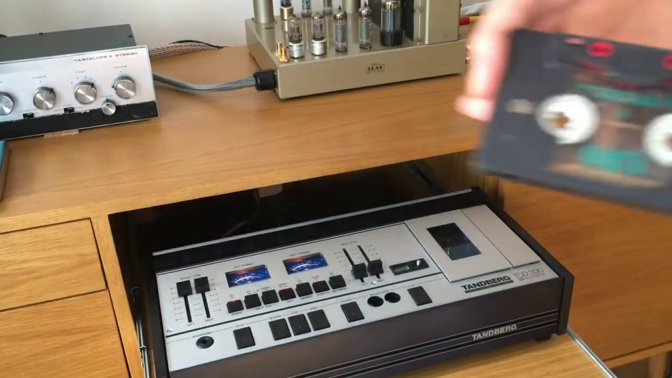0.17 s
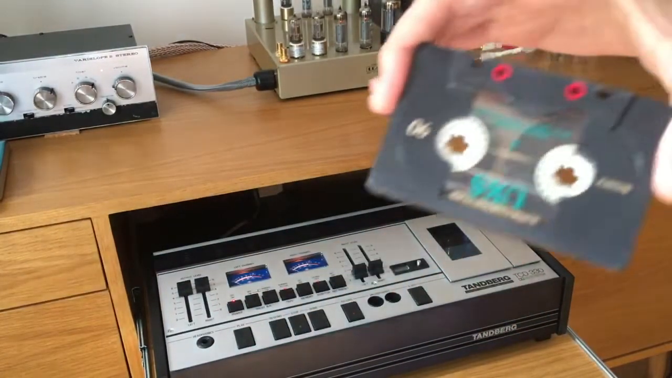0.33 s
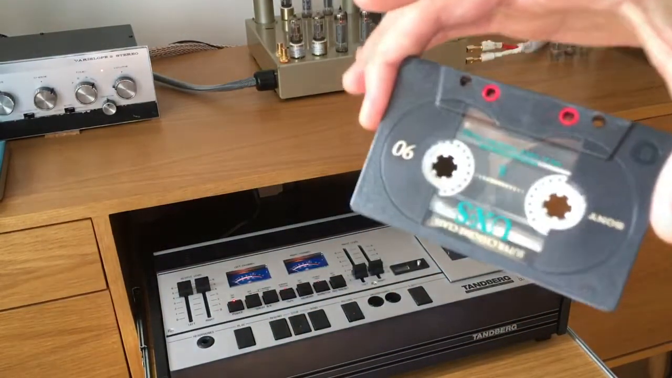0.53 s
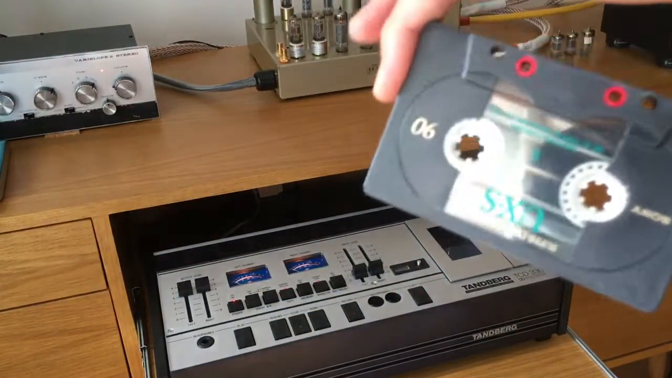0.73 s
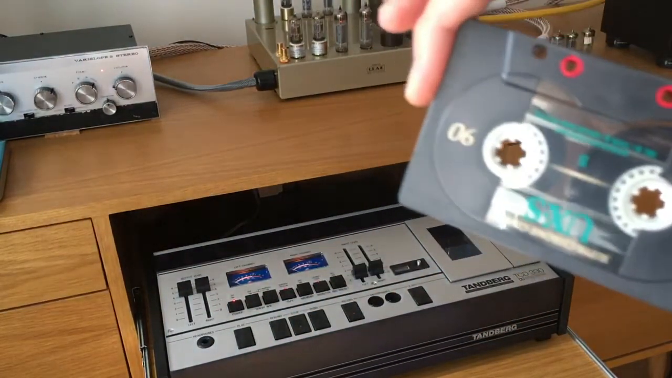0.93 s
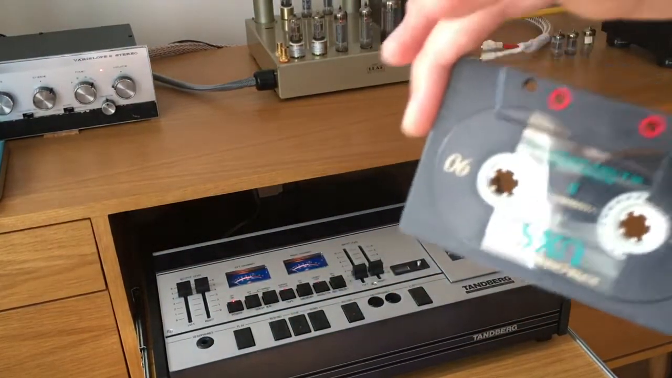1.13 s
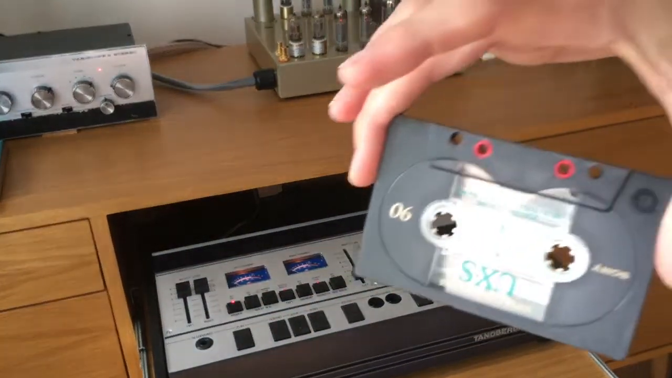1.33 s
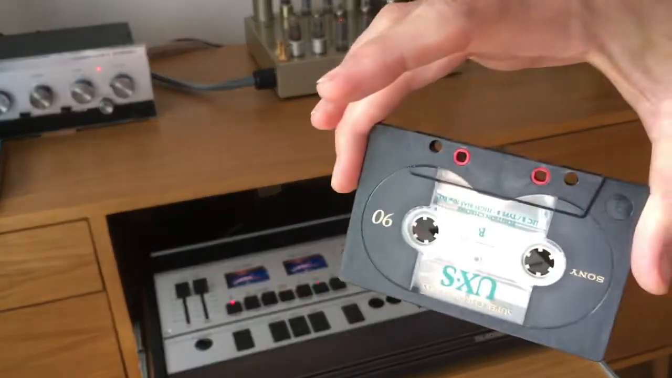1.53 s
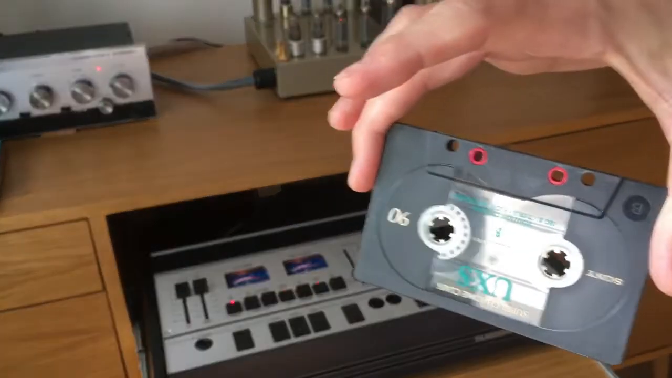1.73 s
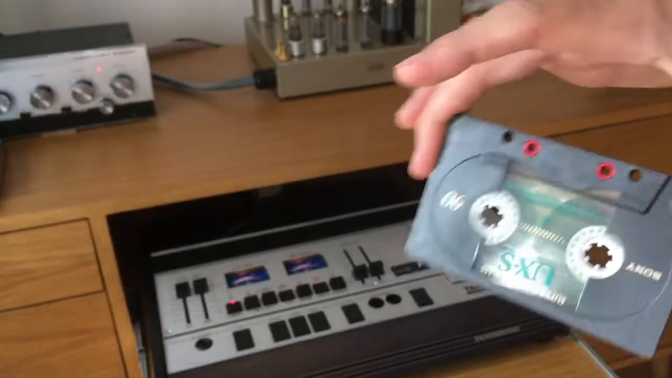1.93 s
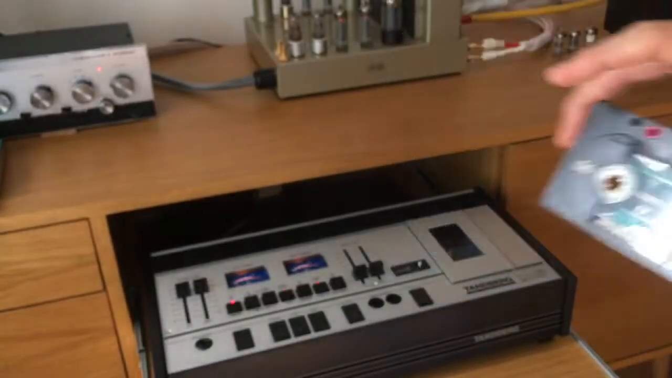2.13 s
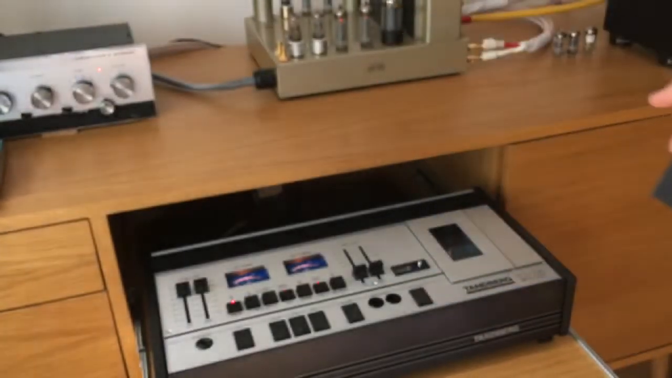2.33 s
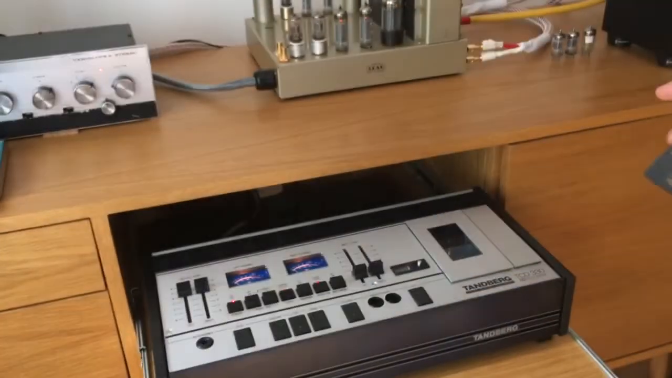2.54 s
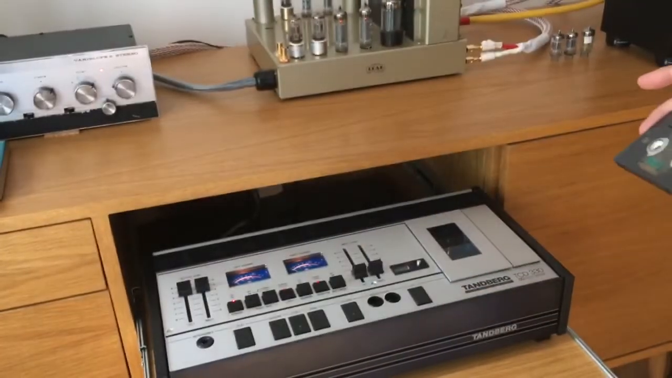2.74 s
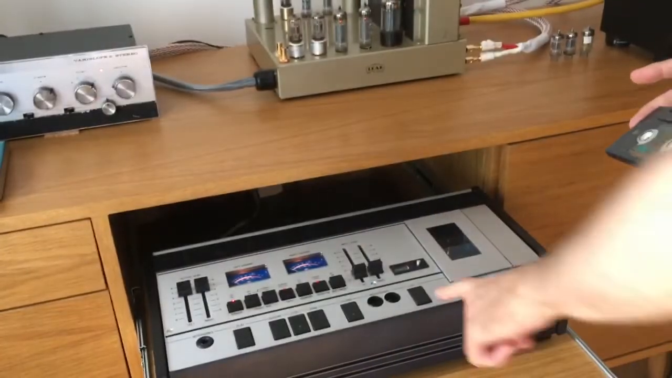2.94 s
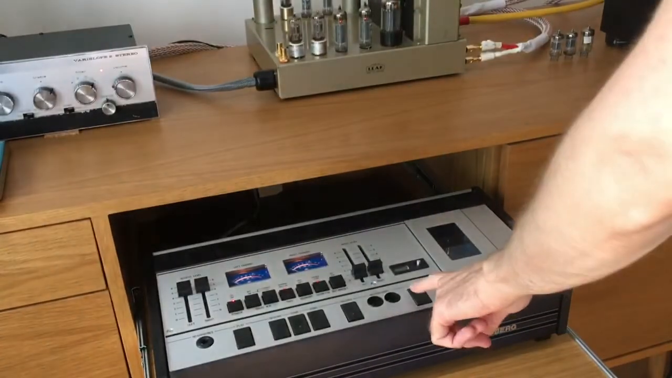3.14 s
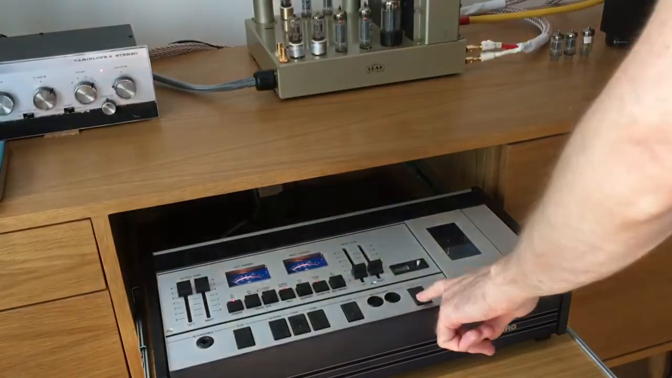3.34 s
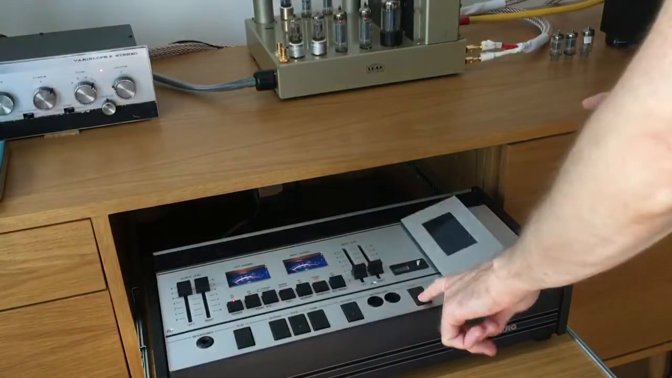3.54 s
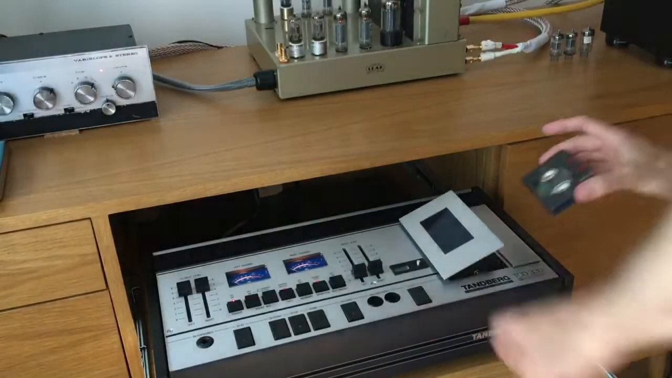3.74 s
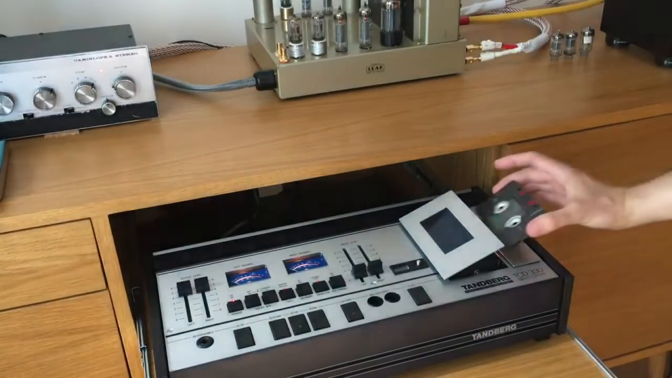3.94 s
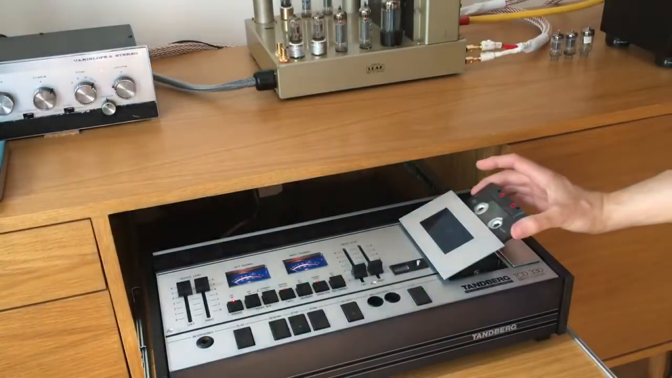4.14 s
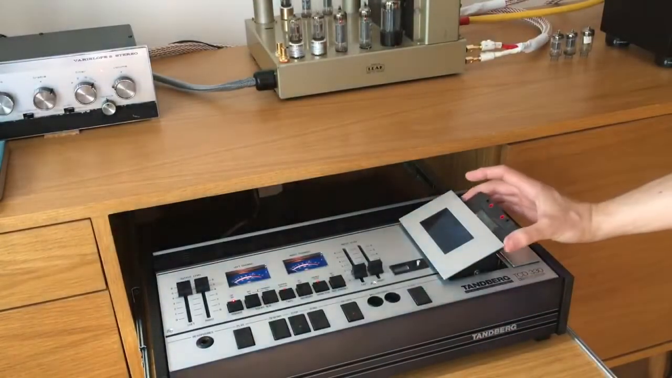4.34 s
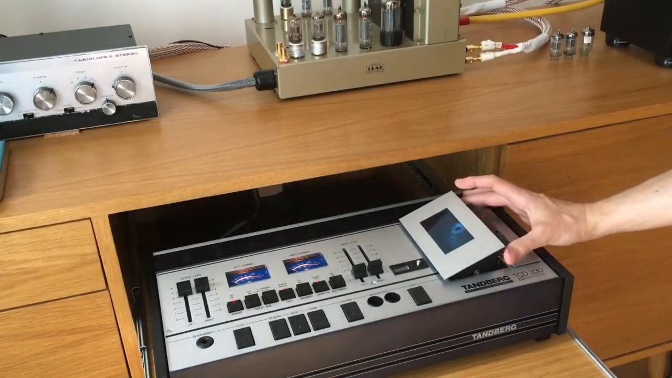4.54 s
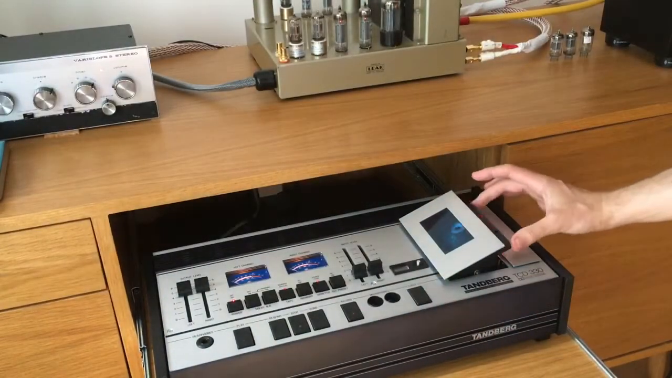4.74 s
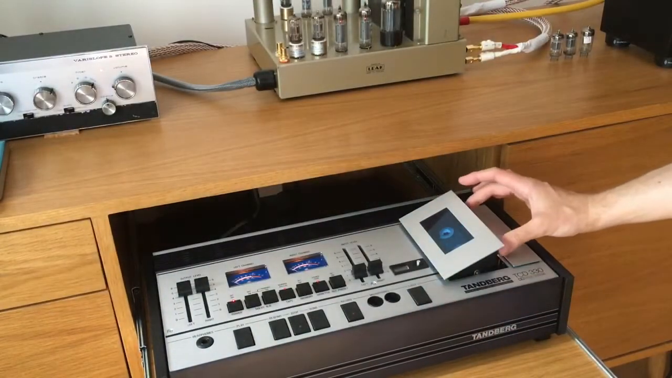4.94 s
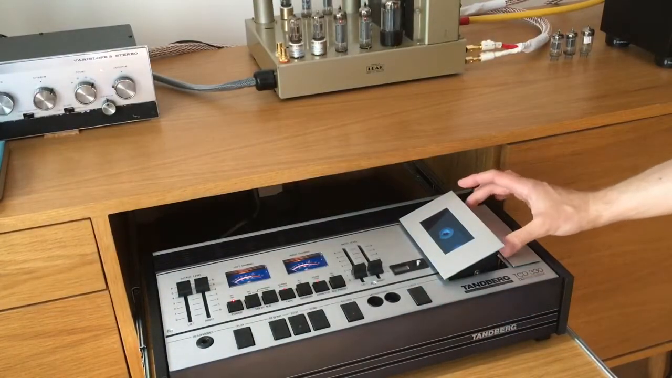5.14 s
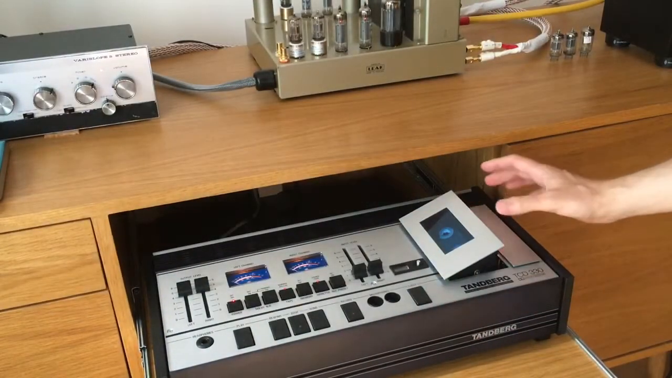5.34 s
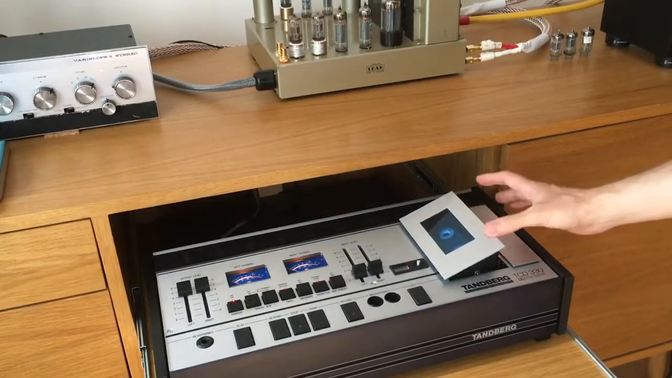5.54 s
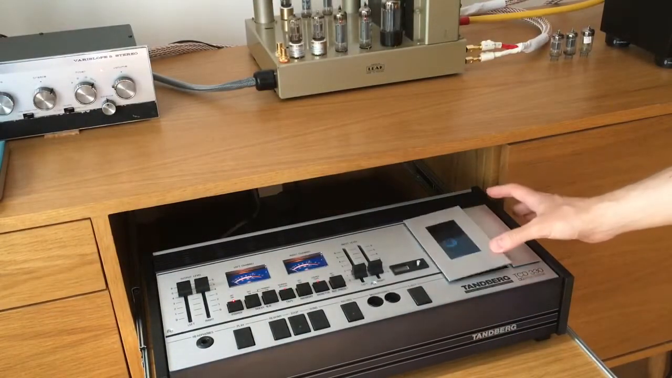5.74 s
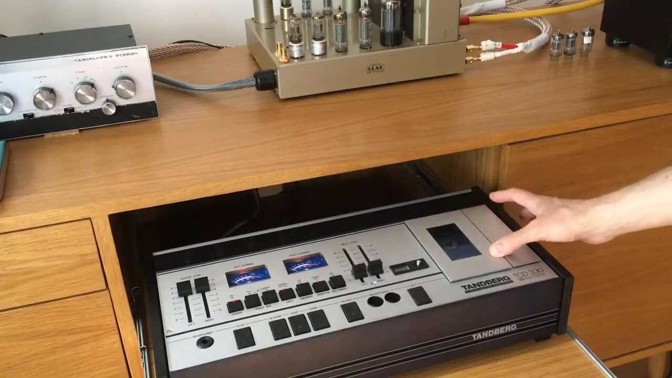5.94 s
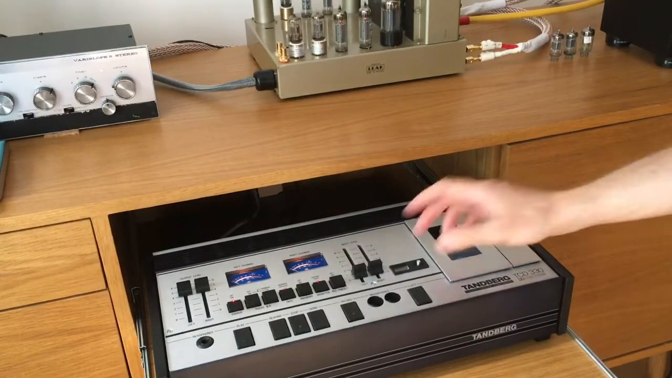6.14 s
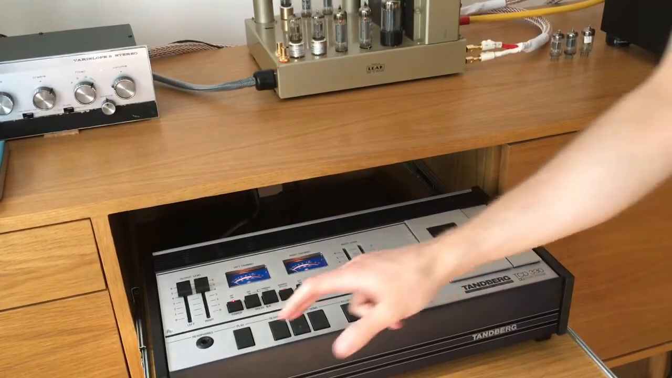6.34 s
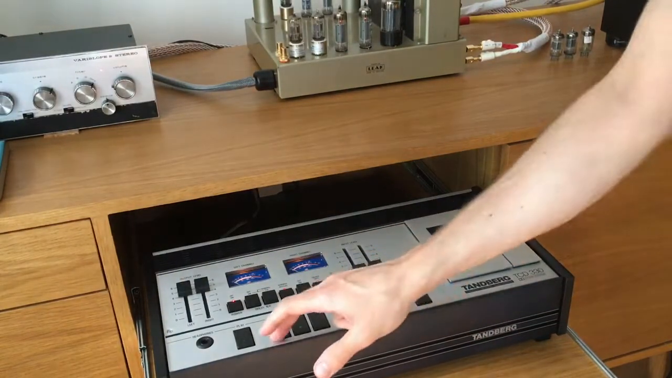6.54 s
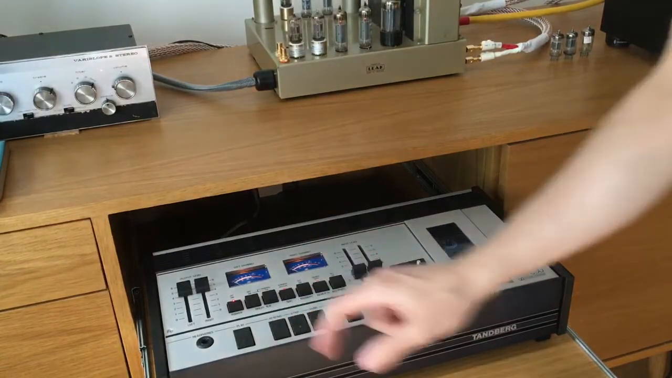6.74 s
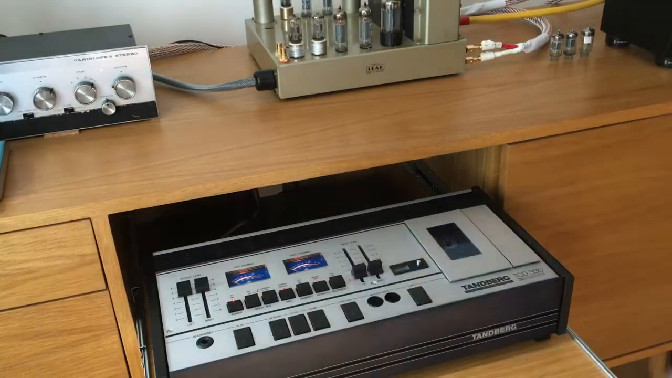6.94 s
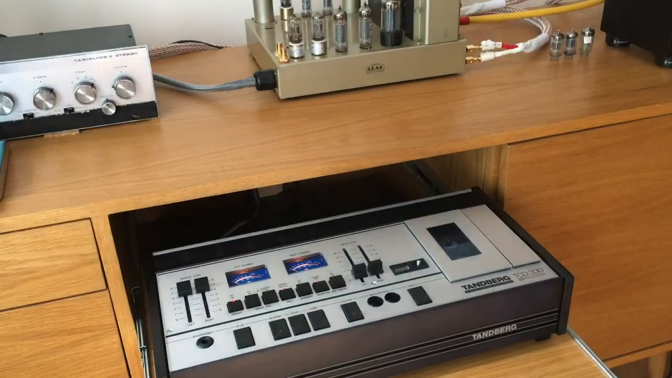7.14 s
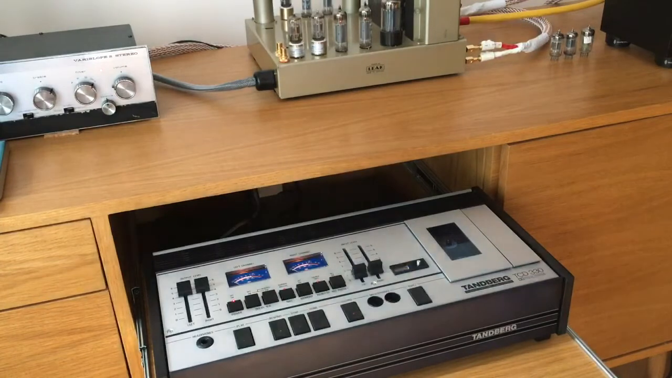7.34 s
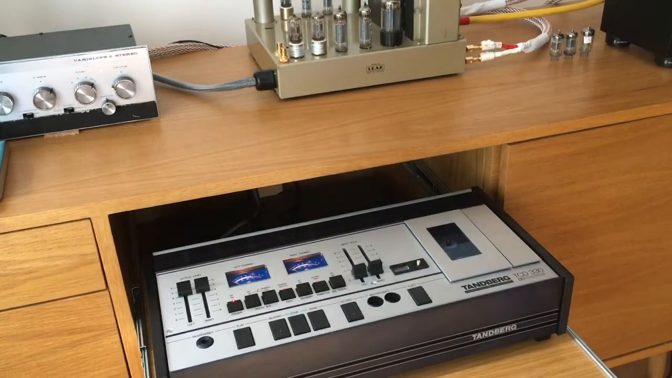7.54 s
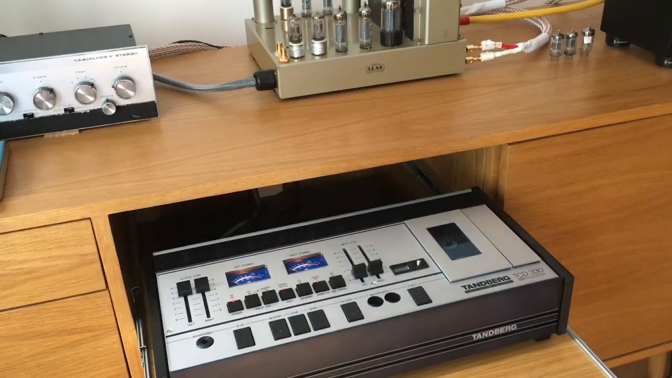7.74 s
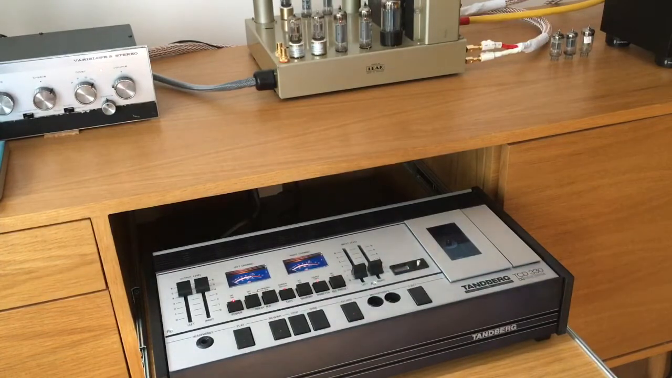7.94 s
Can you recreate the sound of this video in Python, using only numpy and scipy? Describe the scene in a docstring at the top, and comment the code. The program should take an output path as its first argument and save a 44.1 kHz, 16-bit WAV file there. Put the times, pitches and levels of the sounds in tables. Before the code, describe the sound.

A small quiet room with still air and a faint wavering low hum, heard close. Faint dull and plastic ticks of a handled cassette at 0.2-0.4 s, a tiny hub rattle near 0.9 and weak ticks around 2.0. From 2.4 a rattle leads to sharper clacks at 2.5-2.75, the last strong. Barely audible high squeaks near 2.9 and a soft bump at 3.1. At 3.42-3.6 the eject key and door burst open: very loud, bright, overloaded clacks with a deep cabinet thump and springy ring. From 3.96 to 5.2, irregular double taps and faint plastic slides, strongest at 4.9 and 5.1. The door is pushed down with hollow knocks from 5.57, then a tiny creak and bright latch snap at 5.79, and release clack at 5.96. Key touches at 6.3-6.4, a firmer click at 6.6, small ticks near 6.95, then faint hiss and high fluttering whine swell, swing and settle to the end.

```python
"""A cassette deck in a wooden cabinet: the eject key throws the door open, a cassette is slid in, the door snaps shut.
Before that the cassette is turned in the hand; afterwards keys click and the tape starts to hiss and whine.
Every contact is a crack plus a short ring, mostly duller, of the struck part; the cabinet adds deep thumps.
Plastic slides are coloured noise, squeaks are gliding tones. The place is a small room with a diffuse tail,
a low boom, still air and a wavering hum; the recorder clips at full scale and cuts the top.
"""
import sys
import numpy as np
from scipy import signal
from scipy.fft import rfft, irfft
from scipy.io import wavfile
from scipy.ndimage import uniform_filter1d

SR = 44100
rng = np.random.default_rng(int(sys.argv[2]) if len(sys.argv) > 2 else 0)


def wav_out(sig):
    """Save sig, one row per channel (or a flat mono array), as 16-bit PCM at SR to the path in sys.argv[1]."""
    wavfile.write(sys.argv[1], SR, np.round(np.clip(np.atleast_2d(sig).T, -1, 1) * 32767).astype(np.int16))


N = 356769
TIME = np.arange(N) / SR
HIT_SIZE = 8192  # samples given to one crack or ring

# All contact tables: [t/s, level/dB, hardness as treble slope/(dB per octave), ring over crack at 4 kHz/dB]
# The ring column is before each part's own ring tilt, which pivots at 4 kHz.
# Key and latch let go, the door hits its stop and bounces [t/s, level/dB, hardness/(dB/octave), ring/dB]
EJECT_BLOWS = [(3.4163, 2.5, -0.4, 5.5), (3.4233, 9.5, 3, -0.5), (3.4275, 9.5, -0.5, -5),
               (3.47, -5.5, 6.5, -6), (3.472, 14, -1.7, -0.5), (3.4793, 7, 2, -6), (3.5572, 6.5, -0.3, 24),
               (3.5768, -2, -0.5, -4), (3.6132, -10, 1.3, 5)]
# The cassette knocks along the door's guides [t/s, level/dB, hardness/(dB/octave), ring/dB]
LOADING_TAPS = [(3.962, -29.5, 0.5, 20), (4.1029, -40.5, 5.5, -6), (4.2128, -11, -4, 11),
                (4.2793, -27, 3, -5), (4.3032, -12.5, 0.7, -6.5), (4.3715, -30, 5, 0),
                (4.4227, -18.5, -6.5, 3), (4.5388, -12, 1, 2), (4.7762, -23, -0.1, -4.5),
                (4.8412, -18, -3, 4), (4.8758, -16, -4, -5), (4.9228, -5, -5, 6.5), (5.0338, -39, 4, -14),
                (5.132, -9, 1.2, -0.5), (5.1989, -25.5, 0.5, -4.5), (5.3585, -51, 8.5, -7)]
# The door is pushed down, latches and is released [t/s, level/dB, hardness/(dB/octave), ring/dB]
CLOSING_BLOWS = [(5.4932, -40.5, 8.5, 8), (5.5651, -20.5, 1.1, 5.5), (5.605, -6, -4, 13),
                 (5.6465, -8.5, -3.5, 25), (5.668, -6, -7, 18), (5.742, -10, -4, 21), (5.7556, -7, 1.2, -1),
                 (5.7607, -4.5, -1.5, 1), (5.7893, 1, 4.4, 5), (5.9605, -3.5, 0, 0.5)]
# The latch spring sizzles as it catches [t/s, level/dB, hardness/(dB/octave), ring/dB]
LATCH_RATTLES = [(5.791, -24, 10, 9)]
# Keys are touched and pressed [t/s, level/dB, hardness/(dB/octave), ring/dB]
KEY_CLICKS = [(6.3137, -14.5, 3, 3.5), (6.42, -20, -16, -1), (6.4315, -29.5, 4.4, 3), (6.59, -28, -9, 15),
              (6.6128, -6, -4, 4), (6.915, -32, -4, 19)]
# Ticks of the transport as it takes up the tape [t/s, level/dB, hardness/(dB/octave), ring/dB]
TAKE_UP_TICKS = [(6.973, -26.5, -15, 13), (7.06, -31, 1, 14)]
# The cassette handled in the air [t/s, level/dB, hardness/(dB/octave), ring/dB]
SHELL_TICKS = [(0.33, -29.5, 1, 4), (0.3973, -25, 2.6, 1), (1.962, -31.5, 0, 12), (2.01, -35, 0, 4),
               (2.5296, -9.5, 2, 2.5), (2.6168, -3, -1.4, 3.5), (2.6756, -15.5, -3, 9),
               (2.7491, 2, -2, -0.5)]
# The loose hubs drop against the shell [t/s, level/dB, hardness/(dB/octave), ring/dB]
REEL_RATTLES = [(0.9205, -20.5, -9, -1), (2.4078, -23.5, -2, 9)]
# Dull soft bumps: a knock on wood, then a muffled bump, probably of cloth
# [t/s, level/dB, hardness/(dB/octave), ring/dB]
DULL_BUMPS = [(0.2242, -20.5, -10.4, 10), (3.107, -33, -9, 13.5)]

# Resonances of the eject mechanism [f/Hz, width/Hz, level/dB]
MECHANISM_MODES = [(330, 17, -3.5), (650, 75, -8.5), (1090, 120, -1.5), (1390, 61, -4.5), (1600, 180, -6.5),
                   (2626, 310, -1.5), (2920, 350, 0.5), (5770, 700, -6.5), (9060, 330, -3),
                   (13850, 870, -1)]
# Resonances of the cassette holder [f/Hz, width/Hz, level/dB]
HOLDER_MODES = [(153, 25, 15.5), (332, 62, 14.5), (523, 33, 11), (629, 26, 10), (1150, 430, 3),
                (1640, 140, 1), (2780, 370, 7.5), (3400, 350, -7.5), (5700, 1340, -1.5), (13700, 2100, -12)]
# Resonances of the door [f/Hz, width/Hz, level/dB]
DOOR_MODES = [(126, 21, 14.5), (347, 67, 9), (514, 85, 12), (648, 57, 11), (1474, 50, 7), (2920, 580, 2.5),
              (6330, 510, -5.5), (9300, 510, -8), (13500, 430, 0), (14600, 770, -8)]
# Resonances of the latch spring [f/Hz, width/Hz, level/dB]
LATCH_MODES = [(9400, 500, 11), (11300, 700, 13), (13100, 500, 9), (14700, 700, 2)]
# Resonances of a key [f/Hz, width/Hz, level/dB]
KEY_MODES = [(170, 140, -1), (326, 72, -2), (740, 130, 1), (1095, 69, 3), (1670, 150, 8.5),
             (2350, 390, 0.5), (2920, 600, 0.5), (6470, 760, 0.5), (8400, 250, 2.5), (14100, 170, 8)]
# Resonances of the cassette shell [f/Hz, width/Hz, level/dB]
SHELL_MODES = [(172, 110, 3.5), (1080, 110, -22), (1920, 220, -15), (2670, 360, -9.5), (3370, 510, -4.5),
               (6160, 930, -0.5), (11600, 590, -7), (14000, 550, -14)]
# Resonances of a hub [f/Hz, width/Hz, level/dB]
REEL_MODES = [(1040, 250, 17.5), (2830, 180, 20.5), (3290, 240, 19.5), (5830, 820, 3)]
# Resonances heard in the dull bumps [f/Hz, width/Hz, level/dB]
BUMP_MODES = [(645, 110, 6.5), (930, 220, 16.5), (1462, 240, -3.5), (2501, 910, 7)]
# Corners of the broad colour of a struck part [f/Hz]
COLOUR_HZ = [500, 2000, 6000, 13000]

# Deep thumps of the cabinet, strong as the door is thrown open, very faint as it shuts [t/s, level/dB]
THUMPS = [(3.472, -1.5), (3.558, -10), (5.607, -56), (5.792, -43), (5.961, -22.5)]
# Modes of the cabinet (low) and the door springs (long), for a 0 dB thump [f/Hz, level/dB, t60/s]
CHASSIS_MODES = [(36.65, -39.5, 0.57), (62, -41.5, .35), (84.5, -33.5, .3), (110.5, -35, 0.61),
                 (160.4, -30, 0.24), (182.4, -37.5, 0.68), (227, -28, .38), (337, -41.5, .75),
                 (474.2, -60, 2.6), (660, -72, 4.3), (898, -63.5, 1.7), (994, -49.5, 1.3),
                 (1275, -55, 0.98), (1665, -70.5, 2.5), (1910, -66, 2.2), (2133, -76, 3), (2380, -60, 1.3),
                 (2560, -64.5, 2.7)]
# Plastic sliding on plastic [t/s, length/s, level/dB, rubbing resonance f/Hz]
SLIDES = [(3.96, 0.17, -66.5, 3600), (4.126, 0.11, -66, 1590), (4.244, 0.27, -64.5, 3020),
          (4.278, .009, -46, 5950), (4.769, 0.17, -61, 2890), (4.915, 0.08, -58, 1800),
          (5.543, 0.18, -57, 2500), (5.695, 0.13, -52.5, 2870)]
# Faint squeaks as the arm reaches over [t/s, length/s, start f/Hz, middle f/Hz, end f/Hz, level/dB]
SQUEAKS = [(2.85, .17, 11600, 13150, 12400, -70), (2.89, .11, 11000, 11500, 11300, -71),
           (2.97, .13, 12000, 11900, 11700, -71), (2.98, .11, 11100, 10800, 10500, -77),
           (2.98, .09, 4750, 4520, 4400, -74)]
# The latch creaks just before it catches [t/s, length/s, start f/Hz, middle f/Hz, end f/Hz, level/dB]
CREAKS = [(5.759, 0.0063, 2770, 2760, 2820, -25.5)]
# Spectral shape of the tape hiss [f/Hz, relative level/dB]
HISS_COLOUR = [(200, -18), (800, -6.5), (1120, 4), (1420, 4.5), (1750, -7.5), (2800, -2), (4400, -7.5),
               (6500, -4.5), (8000, -7.5), (10500, -5), (13000, -1), (15500, -1.5)]
# Low resonances of the room and furniture [f/Hz, width/Hz, level/dB]
BOOM_MODES = [(106, 37, 0), (160, 18, 4), (183, 8.3, 12), (265, 35, 0)]
# Spectral shape of the room air [f/Hz, relative level/dB]
AIR_COLOUR = [(30, -6.5), (70, 2), (130, -4.5), (185, -4.5), (300, -11), (450, -14), (900, -22.5),
              (2000, -23.5), (4700, -26.5), (6300, -25), (8000, -26), (10500, -24.5), (13000, -21),
              (16000, -23.5)]
# Tones of the hum, about which each wavers [f/Hz, level/dB]
HUM_TONES = [(35.5, -73), (48.5, -63), (97, -78), (184, -75), (258, -81), (624.5, -84.5)]
# The room's tail, before each source's own share of room [f/Hz, relative level/dB, t60/s]
ROOM_BANDS = [(100, 1, 0.31), (300, -3, 0.58), (1000, -7, 0.3), (3000, -11.5, 0.35), (7000, -13.5, .36),
              (15000, -17, 0.24)]

# The loose cassette lands twice; the second touch is weaker and duller (dB per octave)
REBOUND_S, REBOUND_DB, REBOUND_SOFTER_DB = .008, -5.5, 2.5
# The tape starts, and its tension swings a few times before it settles
TAPE_START_S, SWING_PERIOD_S, SETTLE_S = 6.93, 0.34, 0.27
# The room's boom at rest, and its swell as the arm reaches for the eject key
REST_DB, REACH_DB, REACH_S, REACH_WIDTH_S = -68, -55, 3.13, .16


def eject():
    """Key, latch and door stop: hard blows ring the mechanism."""
    return contacts(EJECT_BLOWS, MECHANISM_MODES, rise_s=.0003, crack_t60=.011, ring_t60=0.083,
                    ring_tilt_db=-1.5, low_cut_hz=130, bass_db=-3, treble_db=-0.05)


def loading():
    """The cassette taps the guides and rebounds, ringing the holder."""
    return contacts(rebounding(LOADING_TAPS), HOLDER_MODES, rise_s=0.00067, crack_t60=0.014, ring_t60=0.069,
                    ring_tilt_db=-1.5, low_cut_hz=93, bass_db=-7, treble_db=-2.5)


def closing():
    """Pushing and latching blows ring the door."""
    return contacts(CLOSING_BLOWS, DOOR_MODES, rise_s=0.00055, crack_t60=0.015, ring_t60=0.076,
                    ring_tilt_db=-5.0, low_cut_hz=126, bass_db=-7.5, treble_db=-2.0)


def latch():
    """The light latch spring swells into a bright, thin sizzle."""
    return contacts(LATCH_RATTLES, LATCH_MODES, rise_s=.003, crack_t60=0.022, ring_t60=0.14,
                    ring_tilt_db=1, low_cut_hz=3000, bass_db=-7, treble_db=-10.5)


def keys():
    """Key touches and transport ticks ring small parts."""
    return contacts(KEY_CLICKS + TAKE_UP_TICKS, KEY_MODES, rise_s=.0001, crack_t60=0.008, ring_t60=0.088,
                    ring_tilt_db=-4.5, low_cut_hz=280, bass_db=-7.5, treble_db=-3.5)


def shell():
    """Ticks of the hand-held cassette ring its shell."""
    return contacts(SHELL_TICKS, SHELL_MODES, rise_s=.0001, crack_t60=0.0082, ring_t60=0.132,
                    ring_tilt_db=-4.5, low_cut_hz=110, bass_db=-6.5, treble_db=-6.5)


def reels():
    """Loose hubs drop against the shell; so small a part gives little bass."""
    return contacts(REEL_RATTLES, REEL_MODES, rise_s=0.00025, crack_t60=0.006, ring_t60=0.065,
                    ring_tilt_db=-1.0, low_cut_hz=560, bass_db=-12, treble_db=3.0)


def dull_bumps():
    """Soft contacts, a knock on wood and a muffled bump, excite little treble."""
    return contacts(DULL_BUMPS, BUMP_MODES, rise_s=.0002, crack_t60=0.0085, ring_t60=0.1,
                    ring_tilt_db=-3.0, low_cut_hz=140, bass_db=4.5, treble_db=-11)


def contacts(rows, modes, rise_s, crack_t60, ring_t60, ring_tilt_db, low_cut_hz, bass_db, treble_db,
             halving_db=12):
    """Each contact is a brief crack and a ring in the part's colour; the harder, the brighter."""
    out, f = np.zeros(N), bins(HIT_SIZE)
    part = body(f, modes) / np.sqrt(1 + (low_cut_hz / f) ** 4)  # small parts radiate little bass
    part = part * colour(f, list(zip(COLOUR_HZ, (bass_db, 0, treble_db, 0))))
    octaves = np.log2(np.clip(f, COLOUR_HZ[1], COLOUR_HZ[-1]) / COLOUR_HZ[1])
    for s, db, hardness_db, ring_db in rows:
        ring = undb(ring_db + ring_tilt_db * np.log2(np.maximum(f, 500) / 4000))
        crack_gain = part * undb(hardness_db * octaves) / np.sqrt(1 + ring ** 2)
        brevity = 2 ** (min(ring_db, 0) / halving_db)  # a glancing touch that hardly rings is over sooner
        crack = burst(crack_t60 * brevity, rise_s * brevity) * causal(crack_gain)
        ringing = burst(ring_t60, rise_s) * causal(crack_gain * ring)
        add(out, s, undb(db) * irfft(crack + ringing))
    return out


def rebounding(rows):
    """Every tap is followed by its weaker, duller rebound."""
    rebounds = [(s + REBOUND_S, db + REBOUND_DB, hardness - REBOUND_SOFTER_DB, ring)
                for s, db, hardness, ring in rows]
    return list(rows) + rebounds


def burst(t60, rise_s):
    """Spectrum of a swelling, dying burst of vibration, evenly spread in frequency."""
    t = np.arange(HIT_SIZE) / SR
    envelope = fade(t, t60) * (1 - np.exp(-t / rise_s))
    spectrum = rfft(rng.standard_normal(HIT_SIZE) * envelope)
    smooth_power = uniform_filter1d(np.abs(spectrum) ** 2, size=160)
    return spectrum * causal(smooth_power ** -.5)


def body(f, modes):
    """A part's resonances stand out of its dense background of modes; mean power 1."""
    peaks = sum(undb(db) * resonance(f, hz, width) for hz, width, db in modes)
    return unit(np.abs(1 + peaks))


def chassis(swell_s):
    """Deep thumps: the cabinet booms and the door springs sing on as decaying sines."""
    out, t = np.zeros(N), np.arange(2 * SR) / SR
    ring = sum(undb(db) * fade(t, t60) * np.sin(2 * np.pi * hz * t) for hz, db, t60 in CHASSIS_MODES)
    ring *= 1 - np.exp(-t / swell_s)  # the heavy cabinet takes a moment to get going
    for s, db in THUMPS:
        add(out, s, undb(db) * ring)
    return out


def sliding(grain_db, rub_width_hz, dull_hz):
    """Dense uneven slips ring the holder; the rubbing resonance depends on where the parts touch."""
    out, pressure = np.zeros(N), walk(60)
    for s, length, db, hz in SLIDES:
        i, count = int(s * SR), int(length * SR)
        f = bins(count)
        slips = rng.standard_normal(count) * undb(grain_db * rng.standard_normal(count))
        grip = undb(2 * pressure[i:i + count])  # the parts catch and let go
        rubbing = resonance(f, hz, rub_width_hz) + resonance(f, 1200, dull_hz)
        rub = unit(irfft(rfft(slips) * body(f, HOLDER_MODES) * rubbing, count))
        add(out, s, undb(db) * rub * grip * signal.windows.tukey(count, .5))
    return out


def squeak(rows, waver, flicker_db):
    """Stick-slip tones, each on its own arch of pitch, unsteady in pitch and strength."""
    out, drift, flicker = np.zeros(N), walk(400), walk(70)
    for s, length, start_hz, middle_hz, end_hz, db in rows:
        i, count = int(s * SR), int(length * SR)
        curve = np.polyfit([0, .5, 1], [start_hz, middle_hz, end_hz], 2)
        pitch_hz = np.polyval(curve, np.linspace(0, 1, count)) * (1 + waver * drift[i:i + count])
        tone = np.sin(2 * np.pi * np.cumsum(pitch_hz) / SR)
        strength = undb(db + flicker_db * flicker[i:i + count])
        add(out, s, tone * strength * signal.windows.tukey(count, .5))
    return out


def tape(hiss_db, whine_db, whine_hz, whine_width_hz, flutter_db):
    """The running tape hisses, with a narrow fluttering whine on top; levels are those once settled."""
    f = bins(N)
    hiss = noise(colour(f, HISS_COLOUR)) * undb(hiss_db) * spin_up(rise_s=0.19, overshoot_db=4.0)
    whine = noise(resonance(f, whine_hz, whine_width_hz) ** 2) * undb(whine_db + flutter_db * walk(25))
    return hiss + whine * spin_up(rise_s=0.25, overshoot_db=6.5)


def spin_up(rise_s, overshoot_db):
    """Gain of the starting tape: it comes up to speed, overshoots and swings to rest."""
    since = np.maximum(TIME - TAPE_START_S - rise_s, 0)
    swing = np.exp(-since / SETTLE_S) * np.cos(2 * np.pi * since / SWING_PERIOD_S)
    return np.clip((TIME - TAPE_START_S) / rise_s, 0, 1) * undb(overshoot_db * swing)


def room(x, wet_db, build_s):
    """A diffuse tail builds up after the direct sound, each band fading at its own rate."""
    t, f = np.arange(SR) / SR, bins(SR)
    hz, db, t60 = np.transpose(ROOM_BANDS)
    spectrum, tail = rfft(rng.standard_normal(SR)), 0
    for k, share in enumerate(np.eye(len(ROOM_BANDS))):  # overlapping bands that sum to 1
        envelope = fade(t, t60[k]) * (1 - np.exp(-(t / build_s) ** 2))
        band = irfft(spectrum * np.interp(np.log(f), np.log(hz), share), SR)
        tail = tail + undb(db[k] + wet_db) * band * envelope / np.linalg.norm(envelope)
    return x + signal.fftconvolve(x, tail)[:N]


def boom(flicker_db):
    """Room and furniture rumble faintly, more as the arm reaches over and after many of the blows."""
    f = bins(N)
    reach = undb(REACH_DB) * np.exp(-((TIME - REACH_S) / REACH_WIDTH_S) ** 2)
    after_blows = boom_after(SHELL_TICKS, db=-45.5) + boom_after(EJECT_BLOWS, db=-61)
    after_blows += boom_after(LOADING_TAPS, db=-49) + boom_after(CLOSING_BLOWS, db=-52.5)
    slope = [(40, -16), (100, -1.0), (180, -2.5), (300, -7), (700, -17.0), (2000, -26), (8000, -54.5)]  # f/Hz, dB
    rumble = noise(body(f, BOOM_MODES) * colour(f, slope))
    level = np.sqrt(undb(REST_DB) ** 2 + reach ** 2 + after_blows ** 2)
    return rumble * level * undb(flicker_db * walk(8))


def boom_after(rows, db, rise_s=.02, t60=.45):
    """Envelope of the low boom after the blows of shell, eject, loading or closing, in step with their level."""
    power, t = np.zeros(N), np.arange(SR) / SR
    for s, strength_db, _, _ in rows:
        add(power, s, (undb(db + strength_db) * fade(t, t60) * (1 - np.exp(-t / rise_s))) ** 2)
    return np.sqrt(power)


def background(air_db, hum_waver_db):
    """Still room air as shaped noise, and a hum of slowly wavering tones."""
    f = bins(N)
    air = noise(colour(f, AIR_COLOUR) / np.sqrt(1 + (60 / f) ** 4)) * undb(air_db)
    hum = np.zeros(N)
    for hz, db in HUM_TONES:
        tone = unit(np.sin(2 * np.pi * (hz * TIME + rng.random())))
        hum += undb(db + hum_waver_db * walk(2)) * tone
    return air + hum


def undb(db):
    """Decibels to gain."""
    return 10 ** (np.asarray(db) / 20)


def unit(x):
    """Scale to rms 1."""
    return x / np.sqrt(np.mean(x ** 2))


def fade(t, t60):
    """Exponential decay, 60 dB down after t60."""
    return np.exp(-np.log(1000) * t / t60)


def add(out, s, x):
    """Mix x into out from time s on."""
    i = int(s * SR)
    out[i:i + len(x)] += x[:N - i]


def bins(size):
    """Frequencies of a real spectrum in Hz, no lower than 1."""
    return np.maximum(np.arange(size // 2 + 1) * SR / size, 1)


def colour(f, points):
    """Gain of (f/Hz, level/dB) points on a log-frequency axis."""
    hz, db = np.transpose(points)
    return undb(np.interp(np.log(f), np.log(hz), db))


def resonance(f, hz, width):
    """Complex response of one damped resonance, 1 at its centre."""
    return 1 / (1 + 1j * (f ** 2 - hz ** 2) / (f * width))


def causal(gain):
    """Minimum-phase response with this magnitude: nothing sounds before the blow."""
    cepstrum = irfft(np.log(gain + 1e-9))
    half = len(cepstrum) // 2
    cepstrum[1:half] *= 2
    cepstrum[half + 1:] = 0
    return np.exp(rfft(cepstrum))


def noise(gain):
    """Steady noise of rms 1 with the given spectrum."""
    return unit(irfft(rfft(rng.standard_normal(N)) * gain, N))


def walk(rate_hz):
    """Random wavering of rms 1, slower than about rate_hz."""
    return noise(1 / (1 + (bins(N) / rate_hz) ** 4))


def scene():
    """The deck's mechanism, the hand-held cassette and the room around them."""
    mechanism = room(eject() + loading() + keys(), wet_db=0, build_s=.007)
    door = closing() + latch() + squeak(CREAKS, waver=.01, flicker_db=2.5)
    deck = mechanism + room(door, wet_db=-3.0, build_s=0.0072) + chassis(swell_s=.008)
    handling = shell() + sliding(grain_db=5.5, rub_width_hz=890, dull_hz=3000)
    handling += squeak(SQUEAKS, waver=.011, flicker_db=2)
    near = room(handling, wet_db=2.5, build_s=0.0069) + room(dull_bumps() + reels(), wet_db=-1.5, build_s=.008)
    running = tape(hiss_db=-60.5, whine_db=-65.5, whine_hz=5810, whine_width_hz=460, flutter_db=1.6)
    place = boom(flicker_db=1.5) + background(air_db=-65.5, hum_waver_db=2.1)
    return (deck + near + running + place)[None]


def record(dry):
    """The recorder clips at full scale, then a steep low-pass cuts the top."""
    low_pass = signal.ellip(10, .2, 80, 15900, fs=SR, output="sos")  # ripple/dB, stop band/dB, corner/Hz
    return signal.sosfilt(low_pass, np.clip(dry, -1, 1))


dry = scene()
out = record(dry)
wav_out(out)
```